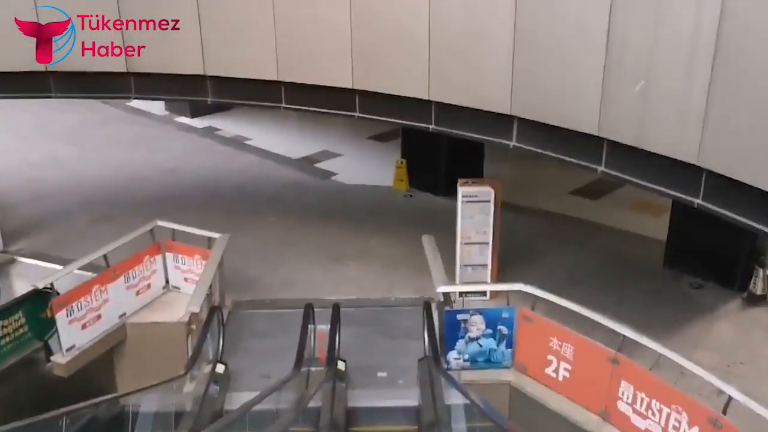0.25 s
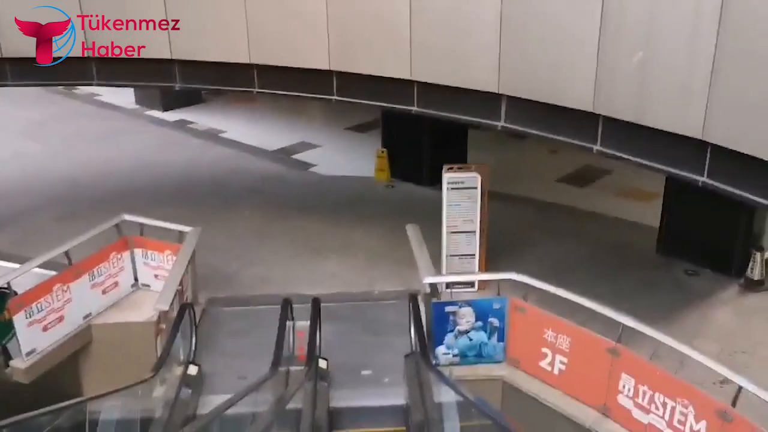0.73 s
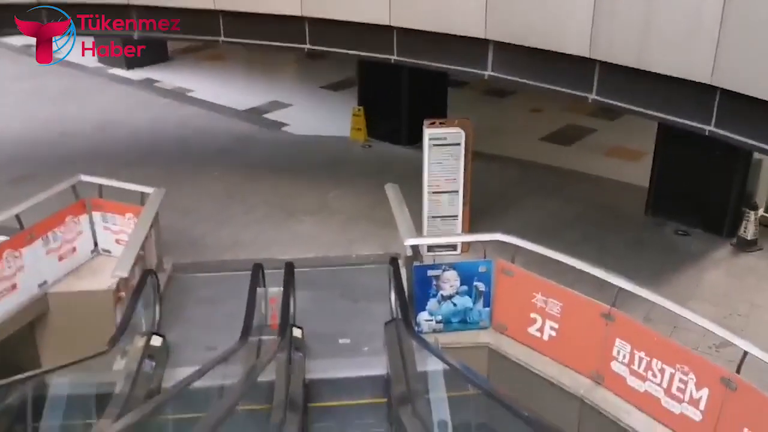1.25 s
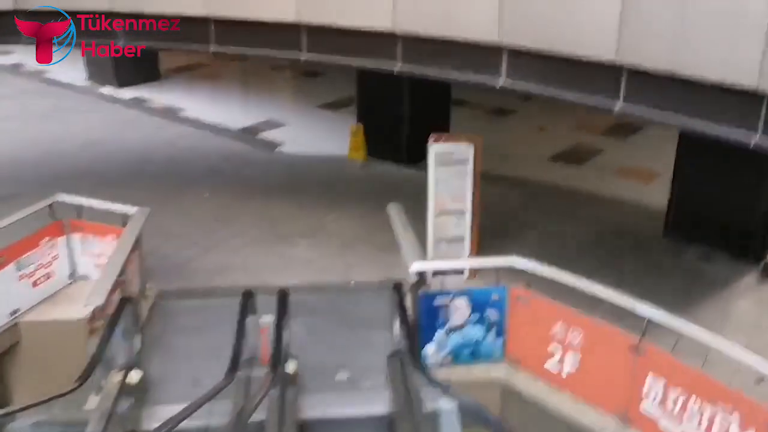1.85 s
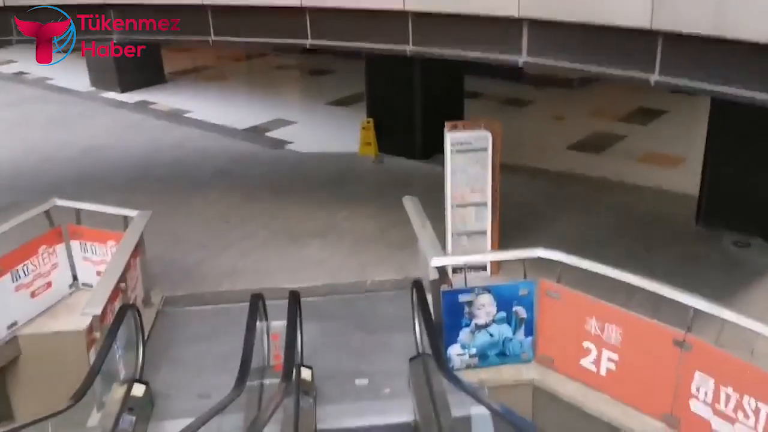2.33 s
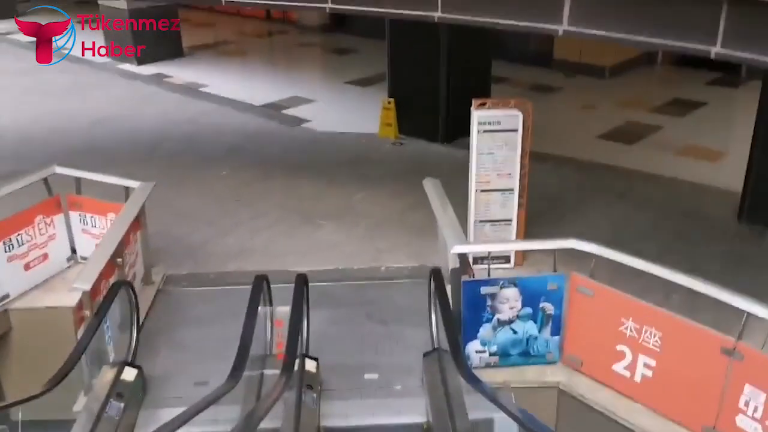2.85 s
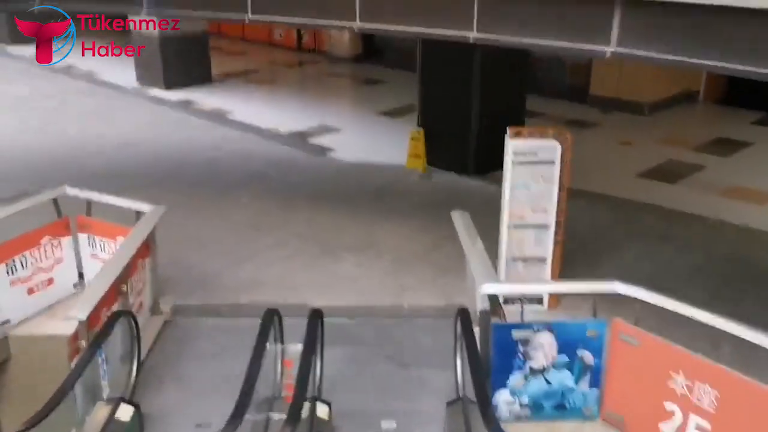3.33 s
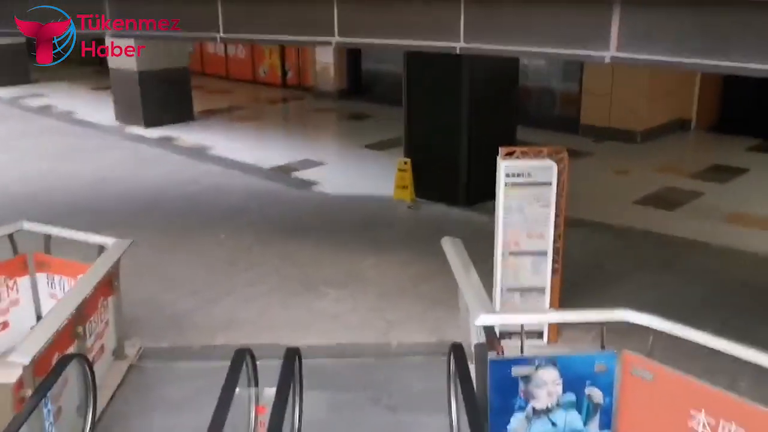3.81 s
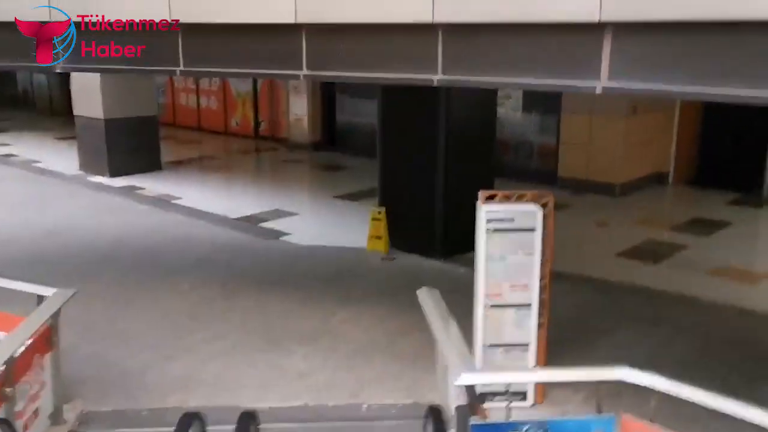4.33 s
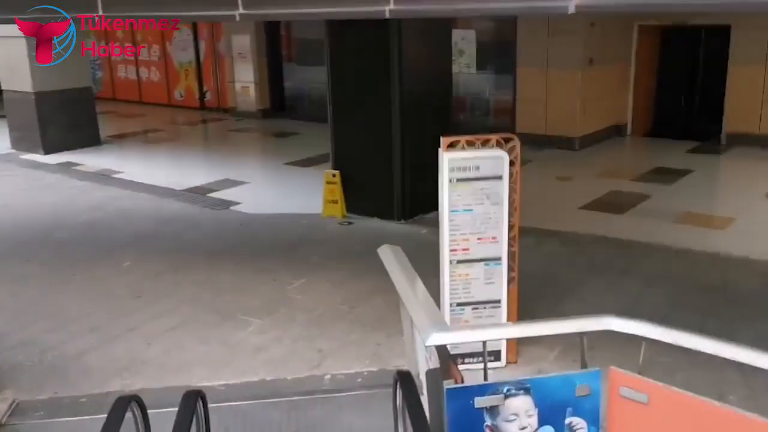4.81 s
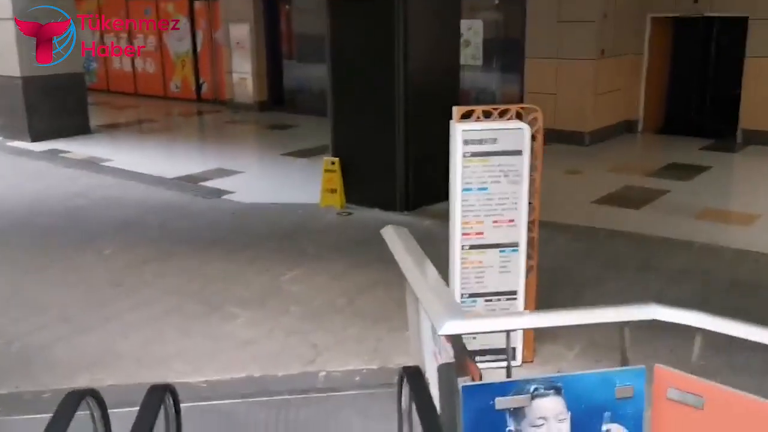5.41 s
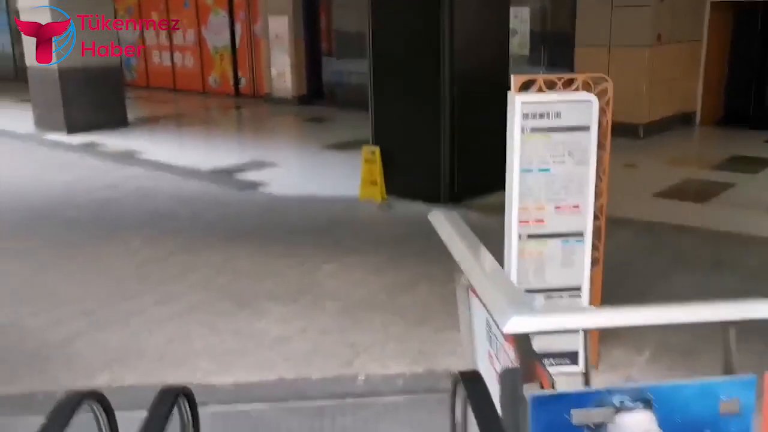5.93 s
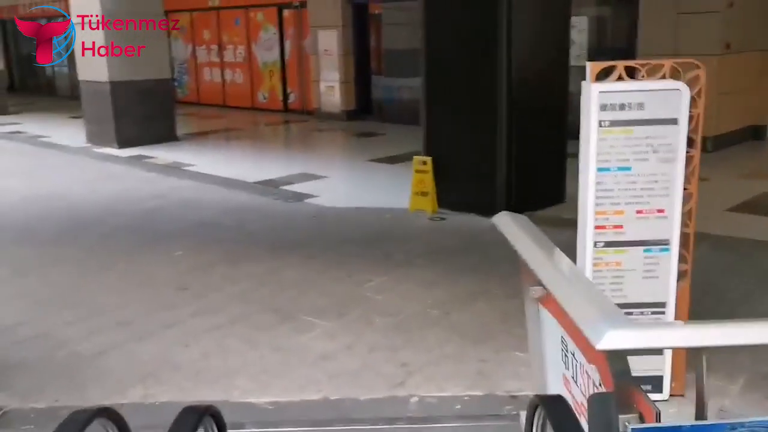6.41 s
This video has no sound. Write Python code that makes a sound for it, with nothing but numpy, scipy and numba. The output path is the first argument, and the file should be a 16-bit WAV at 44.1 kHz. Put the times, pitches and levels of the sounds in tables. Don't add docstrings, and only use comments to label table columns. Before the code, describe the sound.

A phone held in the hand picks up muffled bumps and skin rumble very close, while shoes knock on metal escalator steps about a body's length below. Heels, toes and soles land in irregular clusters, with a thinning around three and a half seconds and a bright, hard slap just before five. Soft cloth swishes, tiny snaps and scrapes fill between; steady low air rush lies underneath.

```python
import sys
import numpy as np
from scipy import signal
from scipy.fft import rfft, irfft, next_fast_len
from scipy.io import wavfile
from scipy.ndimage import uniform_filter1d
from numba import njit

SR = 44100
rng = np.random.default_rng(int(sys.argv[2]) if len(sys.argv) > 2 else 0)


def voltage_ratio(level):
    return 10 ** (np.asarray(level, float) / 20)


def inscribe(sig):
    pcm = np.round(np.clip(np.atleast_2d(sig).T, -1, 1) * 32767)
    wavfile.write(sys.argv[1], SR, pcm.astype(np.int16))


N = 294191

# f/Hz, level/dB per Hz
EDGE_KNOCK = [(700, -56), (1150, 0), (1300, 9.5), (1600, -9.5), (2400, -2.5), (3100, -63), (5000, -14),
              (14000, -49)]


def steps():
    out, t = np.zeros(N), np.arange(SR // 3) / SR
    rise = 1 - np.exp(-t / 0.002)
    for s, db, edge_db, hz, t60, contact_ms in footfalls():
        contact = np.exp(-t * 1000 / contact_ms)
        rattle = 0.66 * voltage_ratio(-60 * t / np.clip(t60, 0.04, 0.5))
        push = rise * (contact + rattle)
        add(out, s - 0.002, tread(push * rng.standard_normal(len(t)), hz, spread=5.7), db)
        add(out, s, push * colour(rng.standard_normal(len(t)), EDGE_KNOCK), db + edge_db - 8)
    return out


# t/s, peak level/dB, tread tone f/Hz, rattle t60/s, edge over peak/dB
HEELS = [(0.666, -24.5, 450, 0.18, -19), (0.926, -30, 337, 0.1, -14), (1.045, -23, 640, 0.24, -19),
         (1.44, -30, 354, 0.28, -28), (1.475, -31, 370, 0.19, -25), (1.795, -26, 280, 0.21, -2.5),
         (2.163, -20.5, 575, 0.27, -16), (2.511, -33.5, 244, 0.45, -36), (2.902, -30.5, 246, 0.18, -21),
         (3.182, -27.5, 243, 0.38, -30), (3.24, -30, 237, 0.24, -41), (3.283, -20, 408, 0.27, -8),
         (4.04, -21.5, 620, 0.31, -33), (4.834, -18, 355, 0.18, -16), (5.128, -27, 364, 0.6, -39),
         (5.226, -22, 523, 0.36, -18), (5.359, -27.5, 380, 0.096, -36), (5.634, -25.5, 490, 0.36, -10.5),
         (5.688, -22.5, 452, 0.36, -26), (5.994, -27.5, 514, 0.34, -43), (6.033, -26.5, 328, 0.11, -32)]
# t/s, peak level/dB, tread tone f/Hz, rattle t60/s
TOES = [(0.15, -39, 316, 0.15), (0.57, -34, 546, 1), (1.691, -38, 338, 0.3), (2.09, -35.5, 242, 0.18),
        (3.942, -36, 347, 0.24), (4.356, -39, 296, 0.35), (4.402, -38, 694, 0.16), (4.738, -35, 325, 0.4),
        (5.957, -35, 332, 0.16), (6.266, -44, 237, 0.19), (6.345, -35, 497, 0.33),
        (6.396, -39.5, 293, 0.27), (6.446, -34.5, 385, 0.18)]
# t/s, peak level/dB, tread tone f/Hz
SOLES = [(0.251, -41.5, 241), (0.302, -39.5, 398), (1.014, -33, 237), (1.352, -33, 240), (1.411, -38, 336),
         (1.759, -35, 520), (1.888, -34.5, 320), (2.06, -41.5, 503), (2.113, -32, 306), (2.439, -35.5, 345),
         (2.774, -39, 256), (2.821, -35.5, 318), (2.851, -35.5, 237), (2.934, -36.5, 240),
         (3.006, -57, 250), (3.582, -30.5, 298), (3.666, -36.5, 493), (3.706, -38, 288),
         (5.529, -36.5, 288), (5.585, -39.5, 320)]


def footfalls():
    heels = [(s, db, edge_db, hz, t60, 10.4) for s, db, hz, t60, edge_db in HEELS]
    toes = [(s, db, -9, hz, t60, 1.0) for s, db, hz, t60 in TOES]
    soles = [(s, db, -19.5, hz, 0.16, 2.0) for s, db, hz in SOLES]
    return sorted(heels + toes + soles)


# f/Hz, width/Hz, level/dB
TREAD_MODES = [(179.6, 58, 2), (222.5, 58, 2.5), (323.6, 55, 4), (402, 72.4, 1.5), (540.4, 55, 2),
               (732, 47.3, -1.5), (851, 113, -8), (1180, 480, -23)]


def tread(force, tone_hz, spread):
    out = 0
    for k, (hz, width, db) in enumerate(TREAD_MODES):
        away_db = spread * np.log2(hz / tone_hz) ** 2
        out = out + (-1) ** k * voltage_ratio(db - away_db) * ring(force, hz, width)
    return out


# t/s, peak level/dB, decay/s, brightness/dB per octave
SLAPS = [
    (0.73, -44, 0.017, 0),
    (1.415, -53, .02, -1),
    (1.799, -41.5, 0.024, -7),
    (2.112, -50, .004, -4),
    (3.283, -41.5, 0.034, -6),
    (4.04, -62, .015, -5),
    (4.465, -31.5, 0.0098, 4),
    (4.837, -19.5, 0.013, -1.5),
]
# f/Hz, level/dB per Hz
SLAP_AIR = [(710, -32), (1200, -1.5), (2420, -9.5), (2690, 7.5), (2950, -11), (3270, -2), (5720, 1),
            (7560, -5), (8650, 2.5), (10900, 0), (14200, 2.5)]


def slaps():
    out, t = np.zeros(N), np.arange(SR // 3) / SR
    for s, db, decay, tilt_db in SLAPS:
        burst = np.exp(-t / decay) + 0.14 * np.exp(-t / (3.3 * decay))
        fade = (1 - np.exp(-t / (0.047 * decay))) * burst
        tone = [(hz, d + tilt_db * np.log2(hz / 4000)) for hz, d in SLAP_AIR]
        add(out, s - 0.002, fade * colour(rng.standard_normal(len(t)), tone), db)
    return out


# t/s, peak level/dB, f/Hz, width/Hz
PLATE_RINGS = [(0.668, -25, 450, 260), (0.928, -27, 325, 109), (1.046, -28, 540, 219),
               (2.1645, -21, 547, 260), (2.440, -41, 560, 300), (2.503, -39, 457, 300),
               (2.513, -32.5, 300, 247), (3.285, -26, 382, 160), (3.291, -37, 1268, 150),
               (4.039, -35, 590, 348), (5.129, -33, 414, 300), (5.214, -33, 480, 150),
               (5.228, -23, 480, 200), (5.359, -31, 480, 250), (5.996, -33, 600, 300),
               (2.905, -38, 600, 400), (0.596, -38, 550, 120), (3.581, -32, 300, 300),
               (5.634, -31.5, 500, 250), (5.690, -22, 463, 198), (5.959, -49.5, 900, 900)]
# t/s, peak level/dB, f/Hz, width/Hz
SNAPS = [(0.958, -34, 1350, 350), (0.959, -46, 1920, 400), (1.352, -44, 940, 500), (1.380, -54, 2500, 3000),
         (1.414, -55, 700, 500), (1.474, -39, 880, 400), (1.497, -41, 11500, 5000),
         (1.516, -51, 11000, 5000), (2.113, -45, 12000, 2500), (2.158, -51, 12500, 2000),
         (3.212, -46.5, 1410, 400), (4.095, -47, 950, 400), (4.402, -54, 1260, 400),
         (4.763, -47, 1270, 300), (6.034, -46, 600, 400), (6.3178, -33, 500, 2480), (6.35, -45, 1320, 200),
         (6.435, -45, 2500, 3000)]


def snaps():
    out, t = np.zeros(N), np.arange(SR // 20) / SR
    for s, db, hz, width in SNAPS + PLATE_RINGS:
        push = np.sin(np.pi * np.minimum(2 * hz * t, 1)) ** 2
        push += (t == 0) * hz / SR
        add(out, s, -band(push, hz, width), db)
    return out


def jolts():
    out, t = np.zeros(N), np.arange(-SR // 20, SR // 4) / SR
    for s, db, hz, t60 in shakes():
        wind_up = np.exp(-(2.7 * hz * t) ** 2)
        fade = np.where(t < 0, wind_up, voltage_ratio(-60 * t / np.clip(t60, 0.02, 0.3)))
        turns = hz * np.where(t < 0, t, t / (1 + 12.4 * np.abs(t)))
        add(out, s + t[0], fade * np.cos(2 * np.pi * turns), db)
    return out


# t/s of the swing, peak level/dB, grip tone f/Hz, t60/s
JOLTS = [(0.675, -18.5, 85.5, 0.046), (1.023, -18, 103, 0.028), (1.057, -20, 80, 0.05),
         (1.361, -14.5, 108, 0.017), (1.448, -22, 67, 0.11), (1.807, -20.5, 76.6, 0.13),
         (1.859, -22, 70, 0.058), (2.168, -21, 166, 0.031), (2.504, -23, 60, 0.028),
         (2.514, -15.5, 71, 0.037), (2.537, -19.5, 39.8, 0.099), (2.915, -20, 100, 0.033),
         (2.947, -23, 87.6, 0.031), (3.244, -18.5, 126, 0.018), (3.306, -18, 95, 0.052),
         (4.048, -15, 90, 0.07), (4.843, -18.5, 70, 0.063), (5.147, -17.5, 83, 0.018),
         (5.188, -24.5, 65.5, 0.07), (5.24, -18, 81, 0.028), (5.367, -23.5, 64, 0.048),
         (5.586, -20.5, 87, 0.059), (5.698, -15.5, 109, 0.039), (6.005, -22, 86, 0.076),
         (6.045, -18, 84, 0.03), (6.069, -25, 84, 0.035), (6.273, -21, 89, 0.058), (6.405, -28, 50, 0.055)]
# t/s of the swing, peak level/dB, grip tone f/Hz
MORE_SHAKES = [(0.053, -29, 98), (0.105, -39, 58), (0.195, -30, 72.4), (0.575, -31.5, 96), (1.34, -22, 101),
               (1.373, -39, 90), (1.553, -26, 59.5), (1.899, -23.5, 64), (2.198, -49, 65), (2.654, -33.5, 58),
               (2.749, -29.5, 50), (2.796, -21, 58), (2.81, -37, 55), (3.012, -30, 94), (3.057, -29, 76),
               (3.214, -24.5, 73.6), (3.586, -35, 85), (3.65, -25, 61.5), (4.206, -33, 77), (4.464, -28, 98),
               (4.593, -32, 82.4), (5.289, -26, 78), (5.545, -26, 44), (5.776, -31, 55), (5.829, -27, 88),
               (5.863, -26.5, 95), (5.966, -36, 81.6), (6.145, -24.5, 92), (6.196, -28, 65.5),
               (6.331, -27.5, 90), (0.613, -35, 50), (0.635, -33, 58), (1.072, -23, 80), (1.093, -28, 85),
               (1.82, -36, 70), (3.4, -30, 60), (4.33, -36, 110), (1.423, -31, 54), (1.495, -31, 91),
               (2.151, -25, 49), (2.184, -30, 93), (2.449, -30, 77), (2.581, -33, 60), (2.691, -31, 71),
               (3.195, -27.5, 129), (3.272, -23, 70), (3.317, -25, 75), (4.489, -33, 101), (4.876, -21, 73),
               (4.926, -27, 71), (5.167, -31, 85), (5.336, -35, 58), (5.522, -29.5, 60), (5.657, -31, 102),
               (5.89, -31, 55), (6.091, -31, 70), (6.311, -32, 74), (6.364, -35, 77), (6.461, -31, 69),
               (6.477, -32, 66), (6.59, -34, 79)]
MORE_SHAKE_T60_S = 0.052


def shakes():
    return JOLTS + [(*row, MORE_SHAKE_T60_S) for row in MORE_SHAKES]


# f/Hz, level/dB per Hz
RUMBLE = [(7.1, -45), (12, -1), (43, 3.5), (70, 3), (95, 2), (134, -5.5), (269, -13.5), (300, -16),
          (390, -81), (660, -120)]


def finger_creep():
    slip = colour(rng.standard_normal(N), RUMBLE)
    envelope = np.abs(signal.hilbert(slip, next_fast_len(N))[:N])
    pressure = uniform_filter1d(envelope, size=700)
    grip = level(slip / pressure ** 0.81 * voltage_ratio(1.4 * walk(20)), 0)
    return voltage_ratio(creep_level()) * clamp() * grip


# t/s, level/dB on the creep
SLACK = [(0, 8.5), (.4, -3), (.85, 2.5), (1.1, 6), (1.65, -4), (2.2, 1), (2.55, -8.5), (2.8, 5), (3.3, 2.5),
         (3.7, -1.5), (4.05, -3), (4.5, 7), (4.85, -2), (5.2, 4), (5.6, 3), (6.05, 2), (6.4, 0.5),
         (6.6, -2)]


def creep_level():
    rise_s, fall_s = 0.027, 0.085
    rows = []
    for s, db, _, t60 in shakes():
        longer_db = 20 * np.log10(t60 / MORE_SHAKE_T60_S)
        rows.append((s, -35.5 + db + 20.5 + longer_db, rise_s, fall_s))
    for s, db, *_ in TOES + SOLES:
        rows.append((s + 0.013, -40 + db + 29.5, rise_s, fall_s))
    return swells(rows, rest_db=-46.5) + np.interp(np.arange(N) / SR, *np.transpose(SLACK))


def clamp():
    t = np.arange(0, N + 64, 64) / SR
    dips = [1 - np.exp(-((t - s) / 0.014) ** 2) for s, *_ in JOLTS]
    return np.interp(np.arange(N) / SR, t, np.prod(dips, axis=0))


# t/s of the peak, level/dB, release/s
SCUFFS = [(.59, -48, 0.054), (.63, -50, 0.034), (.69, -42, 0.064), (.94, -44, 0.1), (1.065, -44.5, 0.097),
          (1.431, -42.5, 0.083), (1.804, -35, 0.08), (2.2, -46, 0.083), (2.46, -55, 0.06),
          (2.82, -58, 0.16), (3.2, -49, 0.054), (3.29, -37, 0.073), (3.61, -50.5, 0.14), (4.01, -65, 0.13),
          (4.441, -38, 0.066), (4.85, -38, .13), (5.16, -46, 0.24), (5.68, -39, 0.042), (6.06, -45, 0.11),
          (6.351, -42, 0.078)]


def scuffs():
    drag = rng.standard_normal(N) * voltage_ratio(2.74 * walk(60))
    scuff_db = swells([(s, db, 0.018, fall) for s, db, fall in SCUFFS], rest_db=-64.5)
    return voltage_ratio(scuff_db) * level(tread(drag, 530.0, spread=0.14), 0)


# t/s of the peak, level/dB, rise/s, release/s
SWISHES = [(.15, -64, .3, .3), (.72, -58.5, 0.38, 0.027), (.93, -59, 0.12, 0.12), (1.06, -58, .04, 0.073),
           (1.34, -61, 0.069, .05), (1.44, -59.5, .04, 0.14), (1.63, -55, .06, 0.23),
           (2.03, -60.5, 0.052, 0.069), (2.21, -53.5, 0.078, 0.047), (2.42, -53.5, 0.1, 0.073),
           (2.58, -63, 0.031, 0.031), (2.81, -59.5, 0.065, 0.072), (2.93, -54, 0.044, 0.11),
           (3.14, -54.5, 0.083, 0.13), (3.31, -63, 0.016, 0.065), (3.7, -59.5, 0.23, 0.079),
           (3.9, -56.5, 0.11, 0.084), (4.05, -61.5, 0.026, 0.11), (4.48, -52.5, 0.044, 0.047),
           (4.4, -63, .2, 0.047), (4.7, -57, 0.092, 0.065), (4.85, -44, 0.014, 0.088),
           (5.0, -58, 0.068, 0.062), (5.13, -61, 0.081, 0.1), (5.24, -59.5, .03, 0.12),
           (5.48, -58.5, 0.06, 0.12), (5.68, -62.5, 0.12, 0.018), (6.08, -59.5, 0.27, 0.067),
           (6.26, -57, 0.076, 0.24), (6.45, -57, 0.095, 0.064)]
# f/Hz, level/dB per Hz
CLOTH = [(700, -3), (1500, -3.5), (2300, -2.5), (3300, -6.5), (3900, -3.5), (7000, -6), (10700, -6.5),
         (14200, -4)]
# t/s, treble level/dB
SHEEN = [(0, 0), (1.5, -1), (1.6, 7), (1.72, 3.5), (1.8, -4), (2.4, 1.5), (3.1, 4), (3.55, -2), (3.7, 3),
         (3.8, -1), (4.7, 3.5), (4.86, 3), (4.98, -17), (5.1, 0), (6.3, 0), (6.67, -4)]


def swishes():
    swish = level(colour(rng.standard_normal(N), CLOTH) * voltage_ratio(0.61 * walk(40)), 0)
    treble = signal.lfilter(*signal.butter(2, 5960, "high", fs=SR), swish)
    sheen = voltage_ratio(np.interp(np.arange(N) / SR, *np.transpose(SHEEN)))
    return voltage_ratio(swells(SWISHES, rest_db=-73)) * (swish + (sheen - 1) * treble)


# middle t/s, peak level/dB, length/s, low band f/Hz, weave band level/dB, upper bands level/dB
SQUEAKS = [
    (0.369, -50, 0.17, 1890, 2.5, -4.5),
    (0.633, -51, 0.039, 2080, -1, -6),
    (1.094, -48.5, 0.22, 1825, -6, -10),
    (1.841, -53, 0.2, 1900, 5, -4),
    (2.928, -53.5, 0.17, 2250, -3, -4),
    (3.697, -42.5, 0.052, 1860, -6, -8),
    (4.203, -57, 0.13, 2130, -9, -5),
    (5.367, -56, 0.069, 2010, -2, -16),
    (5.625, -55, 0.11, 2250, -3, -5),
    (6.093, -47, 0.06, 1800, -7, -22),
]


def squeaks():
    out = np.zeros(N)
    for s, db, length, low_hz, weave_db, upper_db in SQUEAKS:
        start, jerks, shape = puff(s, length)
        lower = band(jerks, low_hz, 190.0) + voltage_ratio(weave_db) * band(jerks, 2250, 260.0)
        upper = band(jerks, 3790, 310.0) + 0.45 * band(jerks, 6850, 420.0)
        add(out, start, shape * (lower + voltage_ratio(upper_db) * upper), db)
    return out


# t/s, peak level/dB, f/Hz, width/Hz, length/s
TICKS = [(0.964, -45, 1450, 890, 0.025), (.21, -49, 754, 110, 0.12), (0.71, -34.5, 500, 90, .03),
         (4.839, -25, 11000, 880, 0.0043), (2.14, -57, 8620, 120, .06), (4.975, -57, 2720, 900, .14),
         (6.365, -45, 1750, 1600, 0.06), (6.42, -52, 2100, 900, 0.059), (1.354, -33, 178, 160, 0.02),
         (2.52, -32, 170, 150, .04), (3.3, -31, 187, 150, 0.09), (5.7, -36, 800, 500, 0.05),
         (6.086, -52, 3520, 300, .05), (5.365, -57, 2670, 290, .03), (3.315, -41, 950, 190, 0.015),
         (0.617, -54, 8550, 200, 0.077), (.735, -53, 9000, 440, 0.024)]


def ticks():
    out = np.zeros(N)
    for s, db, hz, width, length in TICKS:
        start, jerks, shape = puff(s, length)
        add(out, start, shape * band(jerks, hz, 0.66 * width), db)
    return out


def hall_echo(feet):
    lags = np.array([701, 887, 1069, 1283, 1559, 1831, 2203, 2591])
    echo = walls(feet + 1e-18, lags, voltage_ratio(-60 * lags / SR / 0.49), 0.18)
    return voltage_ratio(-27.5) * echo


@njit
def walls(x, lags, gain, damp):
    line, soft, out = np.zeros((8, 8192)), np.zeros(8), np.zeros(len(x))
    for i in range(len(x)):
        total = 0.
        for k in range(8):
            soft[k] += (1 - damp) * (gain[k] * line[k, (i - lags[k]) & 8191] - soft[k])
            total += soft[k]
        out[i] = soft[0] - soft[3] + soft[5] - soft[6]
        for k in range(8):
            line[k, i & 8191] = x[i] + soft[k] - total / 4
    return out


# f/Hz, level/dB per Hz
VENTILATION = [(12, -6.5), (20, -11.5), (48, 2), (83, -7.5), (231, -25.5), (711, -26.5), (1490, -36.5),
               (2190, -36), (3220, -41), (7550, -44.5), (10800, -50), (13100, -47), (14200, -58)]


def ventilation():
    return level(colour(rng.standard_normal(N), VENTILATION), -48.5)


def level(x, db):
    return x * voltage_ratio(db) / np.sqrt(np.mean(x ** 2) + 1e-30)


def colour(x, table):
    hz, db = np.transpose(table)
    grid = np.fft.rfftfreq(len(x), 1 / SR) + 1
    return irfft(rfft(x) * voltage_ratio(np.interp(np.log(grid), np.log(hz), db)), len(x))


def ring(x, hz, width):
    return signal.lfilter(*signal.iirpeak(hz, hz / width, SR), x)


def band(x, hz, width):
    return ring(ring(x, hz, width), hz, width)


def puff(s, length):
    t = np.arange(-SR // 4, SR // 4) / SR
    return s + t[0], rng.standard_normal(len(t)), np.exp(-(2 * t / length) ** 2)


def walk(rate):
    k = int(SR / rate)
    held = np.repeat(rng.standard_normal(N // k + 1), k)
    return 1.88 * uniform_filter1d(uniform_filter1d(held, k), k)[:N]


def swells(rows, rest_db):
    t = np.arange(0, N + 64, 64) / SR
    power = voltage_ratio(rest_db) ** 2
    for s, db, rise, fall in rows:
        before = (1.46 * (s - t) / rise) ** 2
        after = np.abs(1.544 * (t - s) / fall) ** 1.52
        power = power + voltage_ratio(db) ** 2 * np.exp(-np.where(t < s, before, after))
    return np.interp(np.arange(N) / SR, t, 10 * np.log10(power))


def add(out, s, x, db):
    i = int(s * SR)
    x = x[max(-i, 0):N - i]
    out[max(i, 0):max(i, 0) + len(x)] += x * voltage_ratio(db) / (np.abs(x).max() + 1e-12)


def scene():
    feet = steps() + slaps() + snaps() + scuffs() + swishes() + squeaks() + ticks()
    hand = jolts() + finger_creep()
    return (feet + hand + hall_echo(feet) + ventilation())[None]


def band_limit(x):
    return signal.sosfilt(signal.butter(12, 14420, fs=SR, output="sos"), x)


# f/Hz, level/dB
PORT = [(20, -1.5), (3000, 0), (3300, -0.5), (3700, -1.5), (6100, -1.5), (6750, 0), (7500, -2), (9800, -1),
        (10800, 2.5), (11800, -3), (13500, -2.5), (14000, -8)]


def record(dry):
    x = colour(dry[0], PORT)

    def cut(hz):
        return signal.sosfiltfilt(signal.ellip(8, 0.1, 40, hz, fs=SR, output="sos"), x)

    wide = uniform_filter1d(1. * (walk(30) > -0.6), 400)
    return band_limit((wide * cut(13950) + (1 - wide) * cut(13450))[None])


dry = scene()
out = record(dry)
inscribe(out)
```